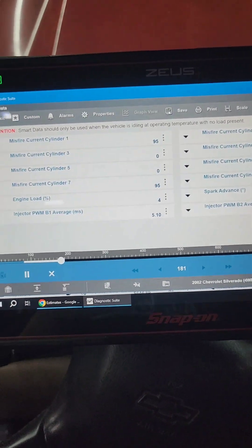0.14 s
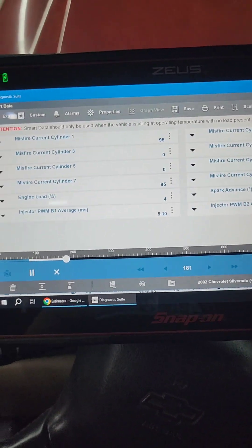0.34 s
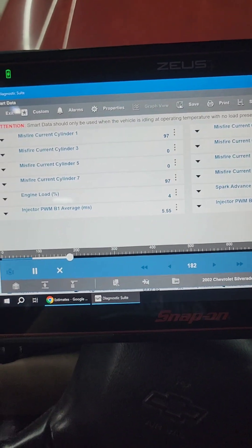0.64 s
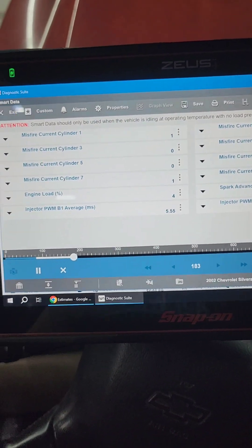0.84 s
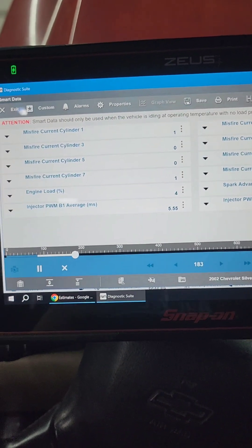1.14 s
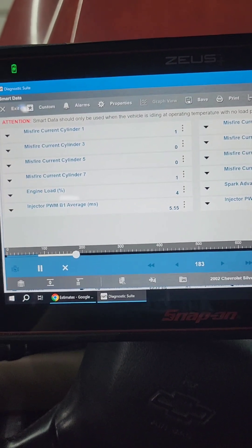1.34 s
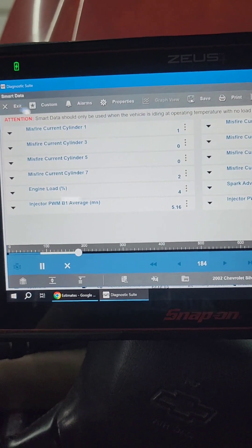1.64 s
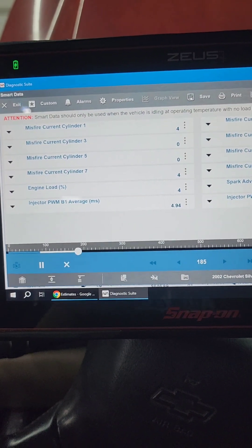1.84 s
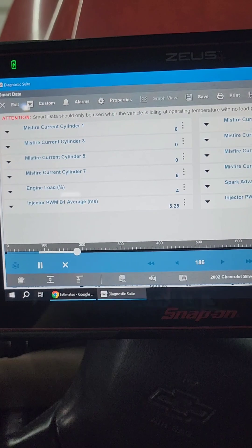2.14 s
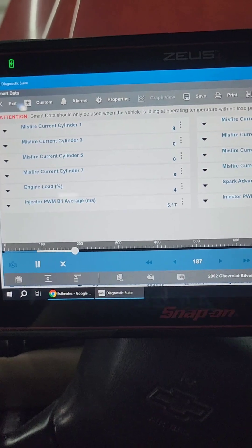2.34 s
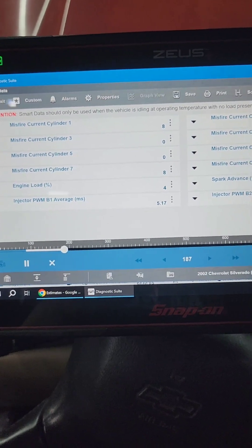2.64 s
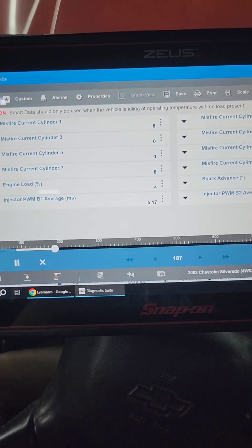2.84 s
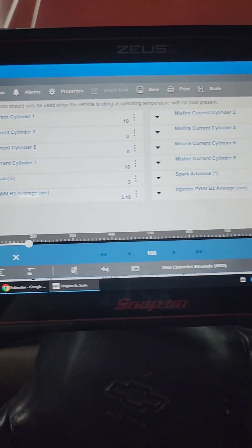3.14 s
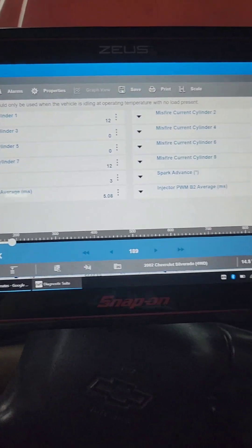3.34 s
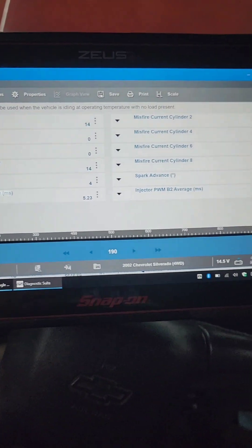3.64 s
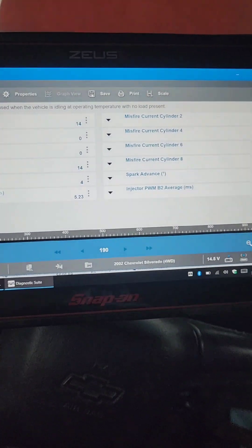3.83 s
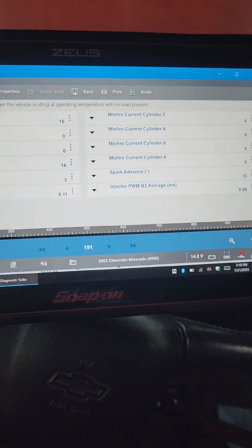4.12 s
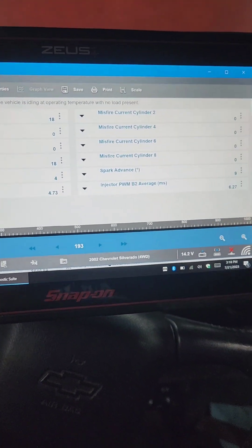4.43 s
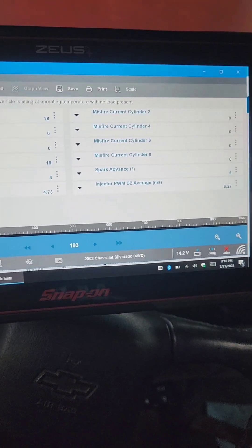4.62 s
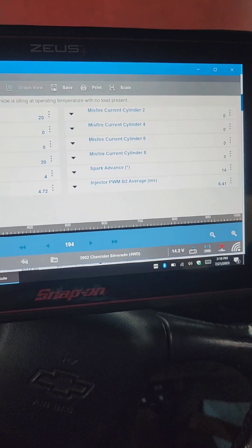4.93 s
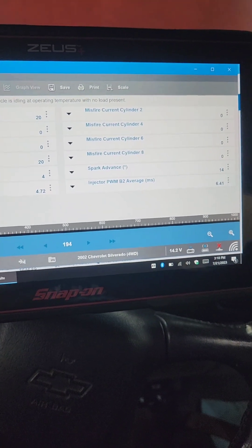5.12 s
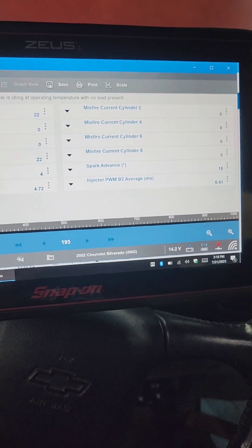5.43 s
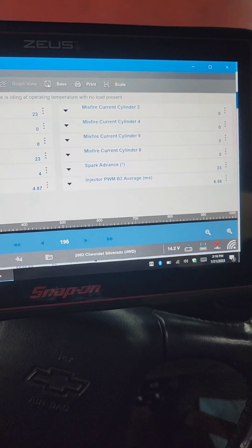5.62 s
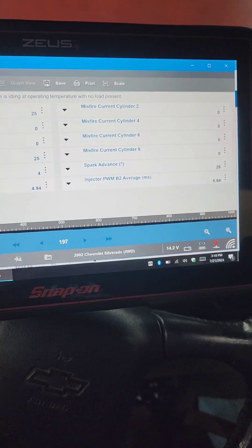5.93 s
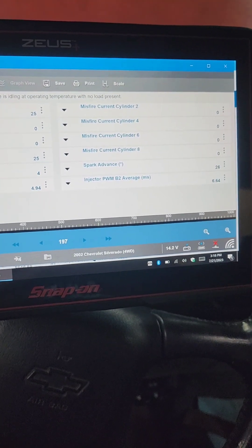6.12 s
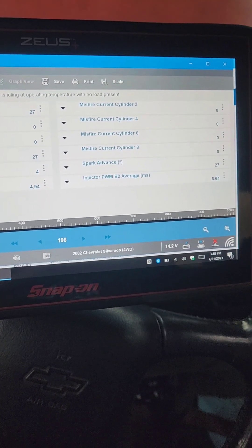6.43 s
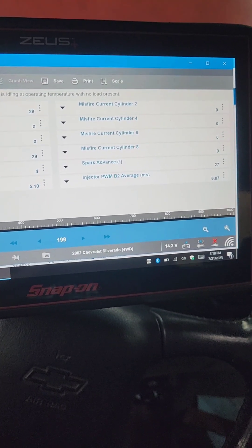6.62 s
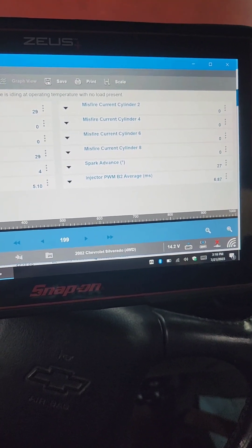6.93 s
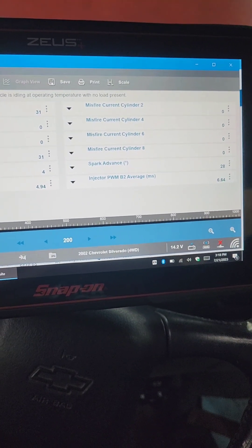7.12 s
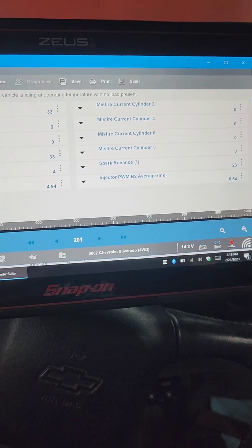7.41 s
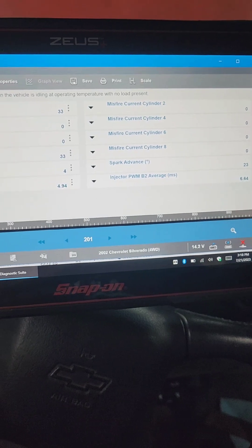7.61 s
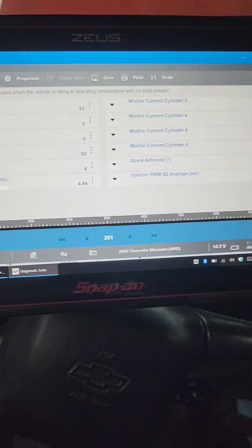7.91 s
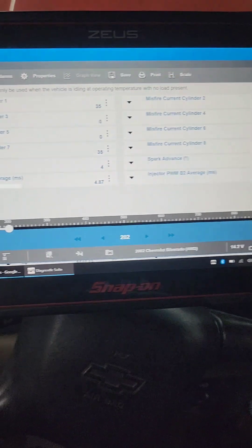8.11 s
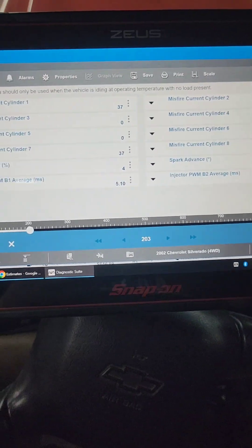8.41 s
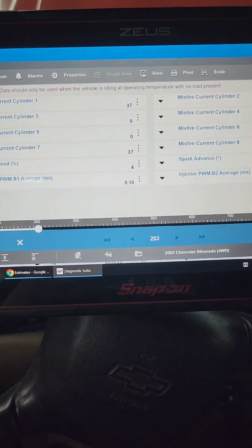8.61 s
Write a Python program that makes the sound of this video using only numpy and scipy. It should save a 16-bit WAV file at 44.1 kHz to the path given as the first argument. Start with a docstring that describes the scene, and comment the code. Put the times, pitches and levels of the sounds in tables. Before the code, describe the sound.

A continuous rough engine idle, close and boomy, captured by a handheld phone in the cab. Uneven combustion throbs low and nearly centred, with a dull clack repeating each cycle and a thin wavering mid hum. Breathy fan and belt noise with high hiss leans right. Speed drifts slightly throughout; isolated light knocks appear, the clearest near the end, and the idle never stops.

```python
"""Rough V8 idle from the cab

A truck engine idles in a workshop, picked up from the cab by the two microphones of a phone.
Misfiring cylinders make the four-stroke cycle uneven, so many orders of it boom in the cab, not the firing order alone.
Ragged combustion rumbles between them over exhaust drones, a dull clack and a wavering hum; all are shaped noise or tones.
Fan, belt and intake noise rushes in from the right, breathing once a cycle; valve gear rattles and a few knocks ring the trim."""
import sys
import numpy as np
from scipy import signal
from scipy.fft import rfft, irfft, next_fast_len
from scipy.io import wavfile
from scipy.ndimage import uniform_filter1d, map_coordinates

SR = 44100
rng = np.random.default_rng(int(sys.argv[2]) if len(sys.argv) > 2 else 0)


def dump(signal):
    """Clip the signal to [-1, 1] and save it as 16-bit WAV at the path in sys.argv[1]."""
    limited = np.clip(np.atleast_2d(signal).T, -1, 1)
    pcm = np.round(limited * 32767).astype(np.int16)
    wavfile.write(sys.argv[1], SR, pcm)


N = 386310
IDLE_RPM = 612  # crankshaft speed to which the rumble level and the beats refer


def amp(db):
    """Gain of a level in dB."""
    return 10 ** (np.asarray(db) / 20)


def unit(x):
    """x at rms 1."""
    return x / np.sqrt(np.mean(x ** 2) + 1e-20)


def along(points, hz):
    """Values at hz from (frequency [Hz], value) points on a log axis."""
    f, v = np.transpose(points)
    return np.interp(np.log(hz + 1), np.log(f + 1), v)


def curves(rows):
    """One value per sample for each column after the time [s]."""
    s, *cols = np.transpose(rows)
    return [np.interp(np.arange(N) / SR, s, c) for c in cols]


def wobble(rate):
    """A smooth random curve, rate knots a second."""
    coarse = np.arange(0, N + 32, 32)  # splined every 32 samples, straight lines between
    knots = rng.standard_normal(int(N * rate / SR) + 4)
    return np.interp(np.arange(N), coarse, map_coordinates(knots, [coarse * rate / SR]))


def filtered(x, response):
    """x times a response of frequency."""
    m = next_fast_len(N + SR // 2)
    spectrum = rfft(x, m) * response(np.fft.rfftfreq(m, 1 / SR))
    return irfft(spectrum, m)[..., :N]


def spread(pair, gain):
    """Two unrelated signals become left and right: alike in the bass, apart and leaning right in the treble."""
    # likeness of the two microphones: (frequency [Hz], left-right correlation)
    alike = [(60, 0.89), (130, 0.91), (290, 0.85), (640, 0.44), (1410, 0.056), (3100, -0.0074),
             (6820, -0.0055), (15000, -0.054)]
    # lean between the microphones: (frequency [Hz], left minus right [dB])
    lean = [(60, 1), (200, 0), (380, -2), (700, -3), (1290, -2.5), (1700, -8), (2380, -8.5), (4400, -13),
            (7000, -8.5), (8000, -22), (10400, -22.5), (11000, -13.5), (15000, -12), (15400, -29.5)]

    def turn(hz):
        return np.arccos(np.clip(along(alike, hz), -1, 1)) / 2

    mid, side = filtered(pair, lambda hz: gain(hz) * [np.cos(turn(hz)), np.sin(turn(hz))])
    left_right = np.array([mid + side, mid - side])
    sides = filtered(left_right, lambda hz: amp(np.outer([.5, -.5], along(lean, hz))))
    return sides / np.sqrt(np.mean(sides.mean(axis=0) ** 2))  # the mono sum has rms 1


def peaks(modes):
    """Gain against frequency of (frequency [Hz], width [Hz], level [dB]) resonances fed with noise."""
    def gain(f):
        power = sum(amp(2 * db) * w ** 3 / ((f - c) ** 2 + w * w / 4) ** 2 for c, w, db in modes)
        return np.sqrt(power)

    return gain


def patchy(depth_db):
    """Two noises whose strength comes in patches of time and frequency."""
    z = signal.stft(rng.standard_normal((2, N)), nperseg=512)[2]
    field = uniform_filter1d(rng.standard_normal(z.shape[1:]), size=8, axis=0)
    field = uniform_filter1d(field, size=10, axis=1)
    return signal.istft(z * amp(depth_db * unit(field)), nperseg=512)[1][:, :N]


def rings(modes, swing_db, depth_db):
    """Narrow resonances fed with patchy noise, at the summed power of their levels."""
    total = np.linalg.norm(amp([db for *_, db in modes]))
    return total * amp(swing_db) * spread(patchy(depth_db), peaks(modes))


def ticks():
    """Each knock in the cab is a brief crack that rings a few trim modes for some milliseconds."""
    # the knocks: (time [s], nominal level [dB], left minus right [dB], crack over the ring [dB])
    knocks = [(1.224, -35, -0.5, -10.5), (3.707, -38, -1, -12), (3.804, -40, -4, -11.5),
              (5.152, -33.5, -1, -13.5), (7.874, -27.5, 4, -10), (8.017, -36, -5, -5.5),
              (8.054, -28.5, 0.5, -8)]
    # trim modes: (frequency [Hz], level before scatter [dB], time to fall 60 dB [s])
    trim = [(450, 0, .02), (850, -2, .012), (1700, -13, .007)]
    rise_s = .0008
    out = np.zeros((2, N + SR))
    t = np.arange(SR // 20) / SR
    for s, db, pan_db, crack_db in knocks:
        knock = sum(amp(level + rng.normal(0, 1.2) - 60 * t / t60) * np.sin(2 * np.pi * hz * t)
                    for hz, level, t60 in trim)
        knock *= 1 - np.exp(-(t / rise_s) ** 2)
        dull_noise = np.convolve(rng.standard_normal(len(t)), np.hanning(14) / 4, "same")
        knock += amp(crack_db - 60 * t / 0.0049) * dull_noise
        out[:, round(s * SR):][:, :len(t)] += knock * amp(db + np.array([[pan_db / 2], [-pan_db / 2]]))
    return out[:, :N]


def hum(cycle):
    """A wavering hum, perhaps a panel, that drifts in pitch and is shaken by the throbs of each cycle."""
    # pitch before the waver: (time [s], frequency [Hz])
    pitch = [(0, 426), (.45, 428), (.7, 418), (1.2, 421), (1.9, 419), (2.2, 429), (2.6, 424), (3, 421),
             (3.8, 429), (4.3, 418), (4.55, 424), (5, 427), (5.4, 420), (6.1, 429), (6.4, 424), (8.76, 424)]
    # level before the swings: (time [s], level [dB])
    level = [(0, -48), (1.2, -46.5), (2.3, -47), (2.7, -43), (3.1, -50.5), (4.2, -48), (4.8, -46.5),
             (5.4, -46), (5.8, -55), (6.3, -44.5), (7.2, -50), (8.2, -47.5), (8.76, -49.5)]
    (hz,), (level_db,) = curves(pitch), curves(level)
    waver = 1.1 * wobble(14) + .6 * wobble(45)  # phase [rad]
    waver = waver + .15 * np.array([wobble(20), wobble(20)])  # a little apart at each microphone
    throb_db = 1.5 * np.cos(6 * np.pi * cycle + 2.6) + 0.68 * np.cos(2 * np.pi * (cycle - .9))
    swing_db = 2.7 * wobble(16) + throb_db
    wave = np.sqrt(2) * np.sin(2 * np.pi * np.cumsum(hz) / SR + waver)
    return amp(level_db + swing_db + [[-.8], [.8]]) * wave


def clatter(cycle):
    """Loose valve gear rattles at uneven moments, hardest three times a cycle."""
    # what the valve gear rings with: (frequency [Hz], width [Hz], relative level [dB])
    modes = [(564, 290, -3.5), (990, 250, 0), (1450, 570, -5.5)]
    blows_per_s, scatter_db = 250, 1.5
    struck = rng.random((2, N)) < blows_per_s / SR
    blows = struck * rng.standard_normal((2, N)) * amp(scatter_db * rng.standard_normal((2, N)))
    level_db = -58.5 + 4 * np.cos(6 * np.pi * (cycle - .2))
    return amp(level_db) * spread(blows, peaks(modes))


def rush(cycle):
    """Fan and belt noise with its rings, intake hiss and valve clatter, breathing with each cycle."""
    # engine-bay rush before breath and flutter: (time [s], level [dB])
    body_level = [(0, -43), (.4, -43), (2, -43), (3.6, -44), (5, -43.5), (6.8, -44), (8.4, -43),
                  (8.76, -43.5)]
    # spectrum of the engine-bay rush: (frequency [Hz], relative density [dB per Hz])
    bay = [(120, -60), (330, 2), (500, -2), (900, -9.5), (1600, -10.5), (1950, -16.5), (2420, -18.5),
           (3750, -21.5), (4500, -25), (5100, -33), (6200, -34.5), (7300, -32.5), (8000, -46.5),
           (8500, -82.5)]
    # spectrum of the high intake hiss: (frequency [Hz], relative density [dB per Hz])
    intake = [(9800, -57), (10300, -22), (11000, -4.5), (12000, 3), (13000, 0.5), (14500, -3.5),
              (15000, -6.5), (15500, -16)]
    # narrow rings from accessories and panels: (frequency [Hz], width [Hz], level before breath [dB])
    panel_modes = [(664, 17, -60.5), (1314, 27, -65.5), (2040, 92, -73.5), (2784, 24, -73.5)]
    # an accessory that whirrs once a cycle: (frequency [Hz], width [Hz], level before swells [dB])
    whirr_modes = [(1605, 55, -64), (1675, 32, -63)]
    # an accessory that sizzles once a cycle: (frequency [Hz], width [Hz], level before swells [dB])
    sizzle_modes = [(3370, 80, -75), (3580, 77, -73), (3623, 300, -67), (3990, 640, -65.5), (6250, 40, -80),
                    (6550, 50, -80), (6220, 590, -73)]
    body_db, = curves(body_level)
    swell_db = 1.5 * (body_db - body_db.mean())  # wider than the slow swings of the rush
    breath = np.cos(2 * np.pi * cycle - 4.3) + 0.18 * np.cos(4 * np.pi * cycle - 2.6)
    flutter = wobble(20)

    body_gain = amp(body_db + 0.15 * breath + .5 * flutter)
    body = body_gain * spread(patchy(depth_db=0.94), lambda hz: amp(along(bay, hz)))
    hiss_gain = amp(-56.5 + swell_db + 0.7 * breath + 0.69 * flutter + .45 * wobble(24))
    hiss = hiss_gain * spread(patchy(depth_db=1.1), lambda hz: amp(along(intake, hz)))

    whirr_db = 1.7 * np.cos(2 * np.pi * (cycle - .8)) + 2.4 * wobble(9) + swell_db
    whirr = rings(whirr_modes, whirr_db, depth_db=2.2)
    sizzle_db = 1.5 * np.cos(2 * np.pi * (cycle - .78)) + 1.0 * wobble(9) + swell_db
    sizzle = rings(sizzle_modes, sizzle_db, depth_db=2.5)
    panels = rings(panel_modes, 0.47 * breath, depth_db=2)
    return body + hiss + clatter(cycle) + panels + whirr + sizzle


def clack(cycle, level_db):
    """Valve gear gives a short dull clack at two points of each cycle, the first the stronger, none alike."""
    # spectrum of the valve gear: (frequency [Hz], relative density [dB per Hz])
    spectrum = [(300, -64.5), (550, -9), (800, 2.5), (1200, -5.5), (2000, -40.5), (4000, -120)]

    def bump(at):
        return np.exp(45 * (np.cos(2 * np.pi * (cycle - at)) - 1))

    gate = (bump(.2) + .7 * bump(.53)) * amp(1 * wobble(10))  # scatter of 1 dB
    noise = spread(rng.standard_normal((2, N)), lambda hz: amp(along(spectrum, hz)))
    return amp(level_db) * gate * noise


def drone(cycle):
    """The exhaust holds rough drones at its resonances, ragged in pitch and throbbing with the cycle."""
    # resonances: (frequency [Hz], level before throbs [dB], throbs [per cycle], crest [share of cycle])
    resonances = [(116, -35.5, 1, .05), (154, -34, 2, .1), (265, -48, 3, .3), (318, -55, 3, .3)]
    t = np.arange(N) / SR
    total = 0
    for hz, db, throbs, at in resonances:
        throb_db = 2 * np.cos(2 * np.pi * throbs * (cycle - at))
        level = amp(db + 0.3 * wobble(9.1) + throb_db)
        total = total + level * np.sqrt(2) * np.sin(2 * np.pi * hz * t + 1.13 * wobble(18))
    return total


def rumble(cycle, rpm, thud_share):
    """No two firings are alike: eight thuds a cycle of random strength, in a roar that throbs thrice a cycle."""
    # ragged combustion in the cab: (frequency [Hz], relative density [dB per Hz])
    combustion = [(8, -73), (20, -60.5), (41, -48), (52, -62), (70, -45), (88, -57), (115, -53),
                  (140, -47.5), (155, -63.5), (168, -51.5), (182, -54), (200, -58), (240, -58.5),
                  (265, -59.5), (290, -62.5), (320, -67), (370, -84.5), (600, -87), (1500, -170)]
    fired = np.diff(np.floor(8 * cycle), prepend=0)
    share = np.clip(thud_share, 0, 1)  # of the driving power
    noise = rng.standard_normal((3, N))
    drive = np.sqrt(share) * unit(fired * noise[0]) + np.sqrt(1 - share) * noise[1]
    speed_db = -31.5 - 0.0424 * (rpm - IDLE_RPM)  # rougher as the speed sags
    level_db = speed_db + 1.4 * np.cos(6 * np.pi * (cycle - .28))
    return amp(level_db) * spread(np.array([drive, noise[2]]), lambda hz: amp(along(combustion, hz)))


def tone(cycle, rpm, order, drift, wander_db):
    """One order of the cycle near rms 1, unsteady in phase and strength; some orders keep step in a beat."""
    # orders in step: (orders, meeting point [share of cycle], turns past crest there at idle,
    # turns gained [per rpm])
    beats = [((6, 12, 15, 18, 19), .91, .55, -.006), ((8, 11, 14), .893, .284, .013), ((3, 9, 20, 21),
             .99, .61, .002), ((5, 7, 13, 17), 0, .44, .009), ((10, 27, 30, 33, 35, 36, 37),
             .02, .88, .015), ((22, 26, 28, 40, 43), .03, .5, .012), ((23, 29, 31), .07, .8, .03)]
    beat = [turns + slip * (rpm - IDLE_RPM) - at * order
            for orders, at, turns, slip in beats if order in orders]
    start = beat[0] if beat else rng.random()
    loose = .5 * drift if beat else drift  # phase wander [rad]
    phase = 2 * np.pi * (order * cycle + start) + loose * wobble(2.5)
    return np.sqrt(2) * np.cos(phase) * amp(wander_db * wobble(2.4))


def booms(cycle, rpm):
    """Uneven firing repeats each cycle: strong orders swell near their cab resonances, higher ones drift more."""
    # strong orders: multiples of the four-stroke cycle rate
    strong_orders = (5, 8, 9, 11, 12, 14, 15, 30, 33, 42)
    # cab resonance beside each: (frequency [Hz], half width [Hz], nominal order level on resonance [dB])
    resonances = [(26.02, 0.59, -31.5), (41.5, 1.1, -38.5), (46.8, 3.4, -31.5), (57.1, 0.97, -33.5),
                  (61.3, 0.73, -37.5), (74.65, 1.9, -34), (76.83, 1.2, -31), (152.7, 1.5, -41.5),
                  (166.4, 1.8, -41), (212.2, 2.7, -45.5)]
    # weaker orders: multiples of the four-stroke cycle rate
    weak_orders = [3, 6, 7, 10, 13, 17, 18, 19, 20, 21, 22, 23, 26, 27, 28, 29, 31, 35, 36, 37, 40, 43, 44,
                   45, 48, 60, 63]
    # their nominal rms levels: (level [dB])
    weak_db = [-42, -44, -45, -55, -39.5, -45, -40.5, -48, -46.5, -44.5, -48, -45, -50, -46.5, -48.5, -43.5,
               -46, -52, -49, -51.5, -53, -56, -55, -55, -57, -60, -60]
    loud = 0
    for k, (hz, half_hz, db) in zip(strong_orders, resonances):
        detuning = (k * rpm / (2 * 60) - hz) / half_hz
        loud = loud + amp(db) / np.hypot(1, detuning) * tone(cycle, rpm, k, drift=.02 * k, wander_db=1)
    rest = sum(amp(db) * tone(cycle, rpm, k, drift=0.031 * k, wander_db=1.4)
               for k, db in zip(weak_orders, weak_db))
    return (loud + rest) * amp([[.2], [-.2]])  # a touch to the left


def scene():
    """The engine layers follow the count of four-stroke cycles, two crank turns each; knocks have set times."""
    # idle speed: (time [s], crankshaft speed [rpm])
    speed = [(0.0, 621.5), (0.8, 623.5), (1.6, 620.0), (2.0, 620.5), (2.4, 608.5), (2.8, 613.0),
             (3.6, 610.5), (4.0, 630.5), (4.8, 610.2), (5.2, 612.5), (6.0, 610.0), (6.8, 601.0),
             (7.2, 610.6), (8.0, 602.0), (8.4, 614.1), (8.76, 614.1)]
    rpm, = curves(speed)
    cycle = np.cumsum(rpm / 120) / SR
    engine = booms(cycle, rpm) + rumble(cycle, rpm, thud_share=0.12)
    engine = engine + drone(cycle) + clack(cycle, level_db=-50)
    return engine + hum(cycle) + rush(cycle) + ticks()


def record(dry):
    """The phone opens softly, passes nothing in a gap of the treble and nothing above its band limit."""
    # the gap: (lower edge [Hz], upper edge [Hz])
    gap = (8450, 9950)
    top_hz, fade_s = 15520, .004
    fade = np.minimum(np.arange(N) / (SR * fade_s), 1)
    return filtered(dry * fade, lambda hz: (hz < top_hz) & ((hz < gap[0]) | (hz > gap[1])))


dry = scene()
out = record(dry)
dump(out)
```